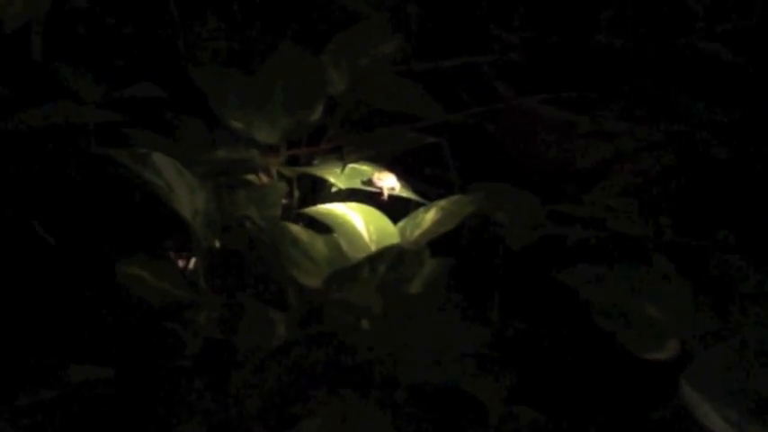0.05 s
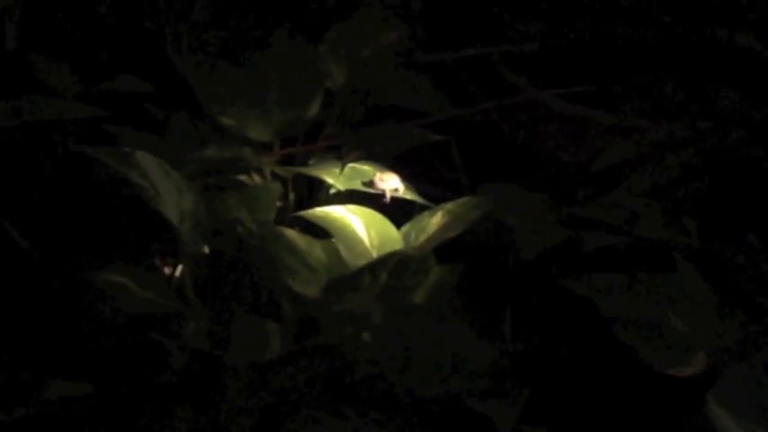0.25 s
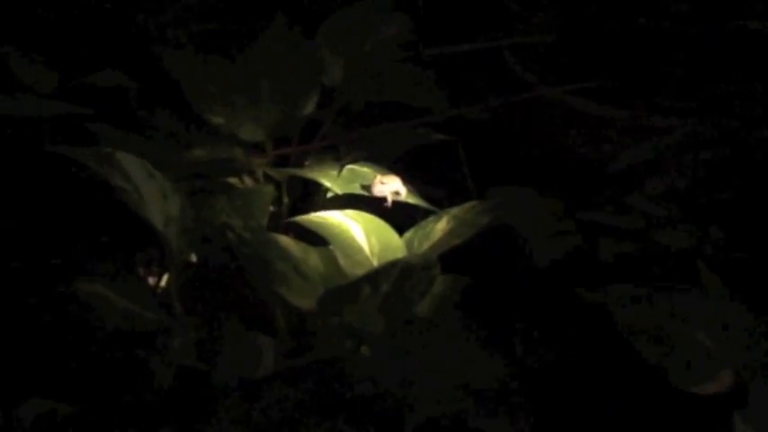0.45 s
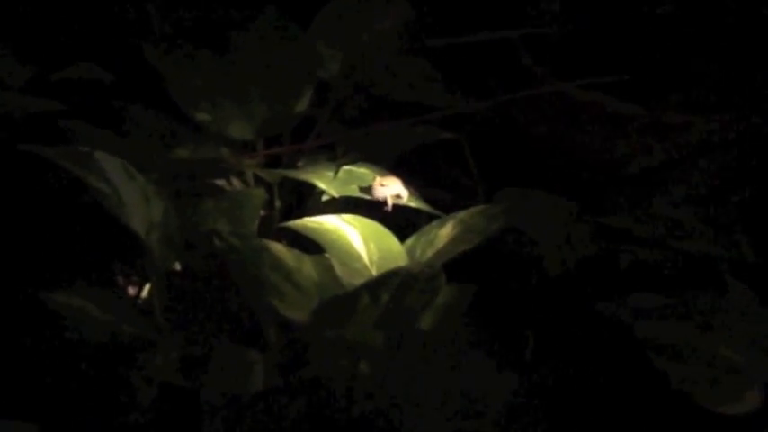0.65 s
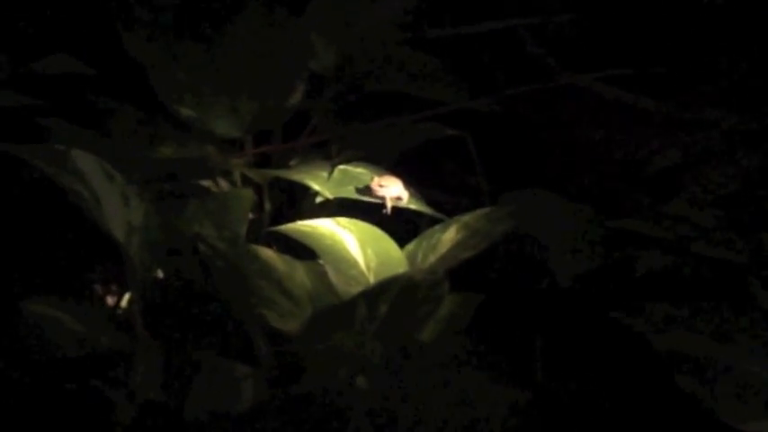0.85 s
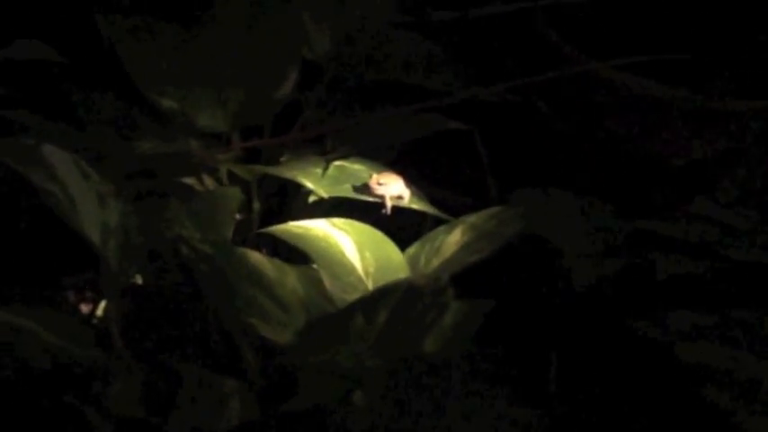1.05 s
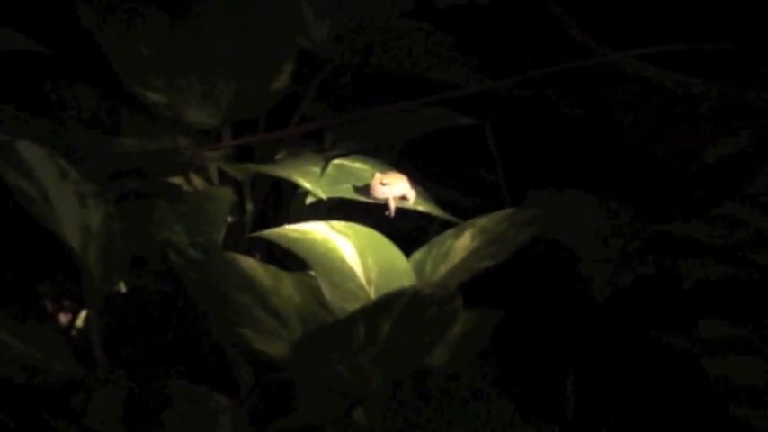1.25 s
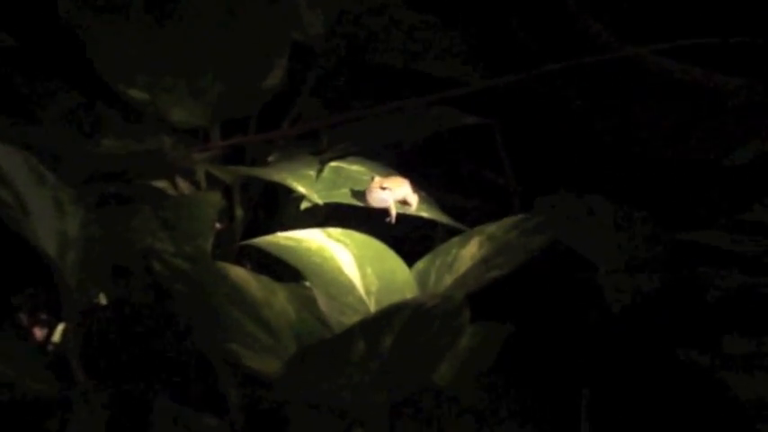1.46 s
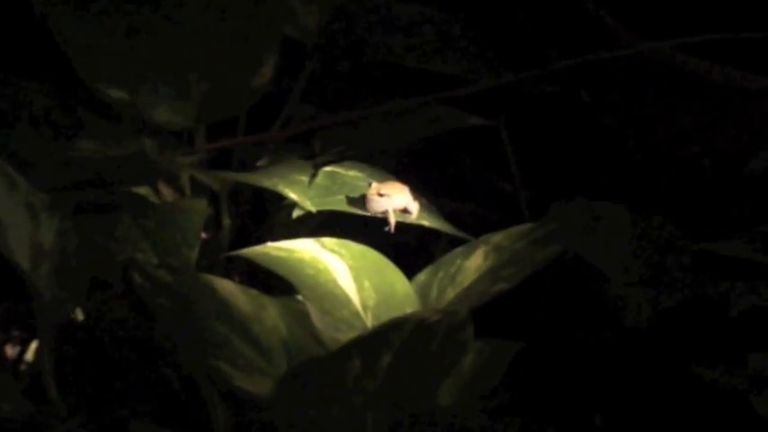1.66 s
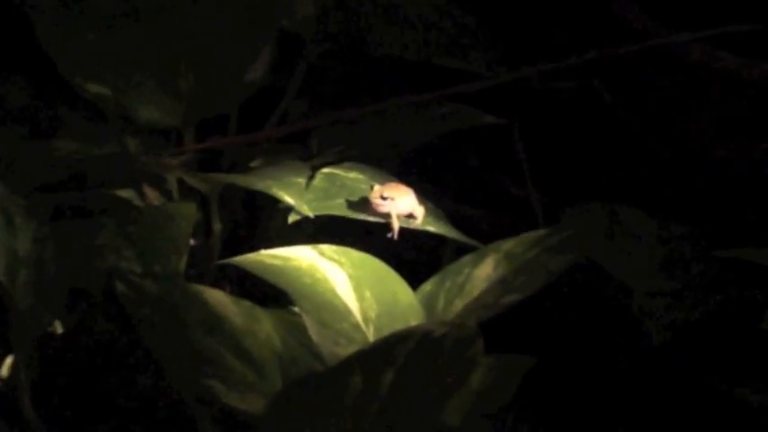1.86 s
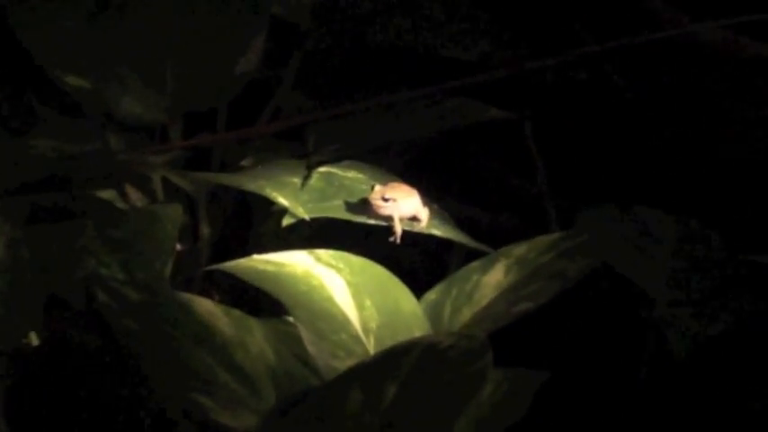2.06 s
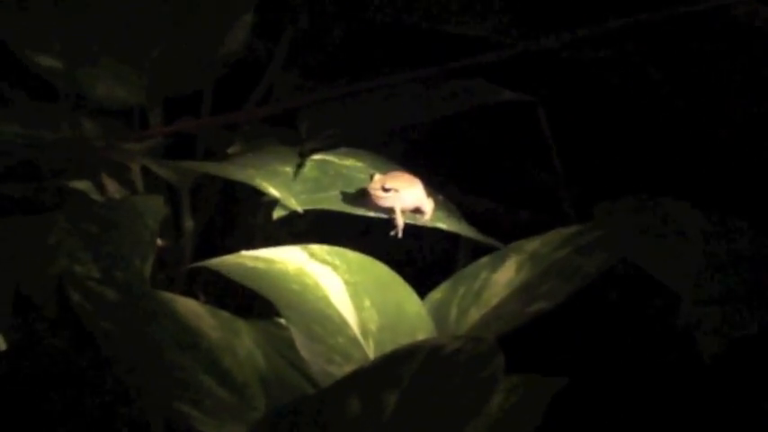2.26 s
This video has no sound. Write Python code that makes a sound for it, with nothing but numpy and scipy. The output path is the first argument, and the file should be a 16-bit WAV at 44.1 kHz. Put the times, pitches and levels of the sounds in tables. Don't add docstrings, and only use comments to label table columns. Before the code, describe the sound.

A small tree frog whistles two loud low-to-high calls close by in a night garden

```python
import sys
import numpy as np
from scipy import signal
from scipy.fft import rfft, irfft
from scipy.io import wavfile
from scipy.ndimage import uniform_filter1d

SR = 44100
rng = np.random.default_rng(int(sys.argv[2]) if len(sys.argv) > 2 else 0)


def digitize_waveform(pressure):
    field = np.atleast_2d(pressure).T
    bounded = np.clip(field, -1, 1)
    quanta = np.round(bounded * 32767).astype(np.int16)
    wavfile.write(sys.argv[1], SR, quanta)


def magnitude_from_level(level_db):
    exponent = np.asarray(level_db, float) / 20
    return 10 ** exponent


N = 101429
T = np.arange(N + SR // 2) / SR - .5


def drift(rate):
    r = np.exp(-2 * np.pi * rate / SR)
    slow = signal.lfilter([1], [1, -2 * r, r * r], rng.standard_normal(len(T) + SR))[SR:]
    return slow / slow.std()


def rms_one(x):
    return x / np.sqrt(np.mean(x ** 2))


def unit_energy(x):
    return x / np.sqrt(np.sum(x ** 2))


def resonate(x, hz, width_hz):
    r = np.exp(-np.pi * width_hz / SR)
    return signal.lfilter([1, 0, -1], [1, -2 * r * np.cos(2 * np.pi * hz / SR), r * r], x)


def gate(t, length, attack, release):
    rise = 1 - np.exp(-np.maximum(t, 0) / attack)
    return rise * np.exp(-np.maximum(t - length, 0) / release)


def tone_at(hz):
    return np.sin(2 * np.pi * np.cumsum(hz) / SR)


def night_air():
    # f/Hz, level/dB per Hz
    air = [(15, -50), (25, -22.5), (381, -6), (1710, -13), (2040, -9), (3960, -9), (5650, -19.5),
           (7290, -17.5), (11000, -28), (14200, -78.5), (22000, -120)]
    hz, db = np.transpose(air)
    f = np.maximum(np.fft.rfftfreq(len(T), 1 / SR), 1)
    tilt = magnitude_from_level(np.interp(np.log(f), np.log(hz), db))
    hush = irfft(rfft(rng.standard_normal(len(T))) * tilt, len(T))
    return magnitude_from_level(-49.5) * rms_one(hush)


def distant_chorus():
    # f/Hz, width/Hz, level/dB
    chorus = [
        (2039, 78, -55.5),
        (3610, 360, -52.5),
        (3870, 180, -54),
        (266, 59, -67.5),
    ]
    out = 0
    for centre_hz, width_hz, level_db in chorus:
        band = resonate(rng.standard_normal(len(T)), centre_hz, width_hz)
        band = resonate(band, centre_hz, width_hz)
        out = out + magnitude_from_level(level_db + 1.8 * drift(12)) * rms_one(band)
    return out


def motor():
    # t/s, f/Hz, level/dB
    hum = [(0.0, 395.2, -47.5), (0.154, 399.3, -58.5), (0.178, 396.7, -73), (0.218, 417, -54.5),
           (0.614, 419, -67.5), (0.628, 406.5, -57), (0.846, 396.4, -48), (0.94, 398.4, -59),
           (1.002, 396, -46), (1.144, 393.6, -63), (1.172, 394, -50.5), (1.332, 387.3, -68.5),
           (1.546, 415.2, -71), (1.6, 397, -62.5)]
    fade_s = 0.033
    s, hz, db = np.transpose(hum)
    fade = np.exp(-np.maximum(T - s[-1], 0) / fade_s)
    return np.sqrt(2) * magnitude_from_level(np.interp(T, s, db)) * fade * tone_at(np.interp(T, s, hz))


def insects():
    # strokes/per s, sweep from f/Hz, sweep to f/Hz, level/dB
    buzzers = [
        (134.4, 7550, 6670, -55.5),
        (128.7, 6900, 7510, -61),
        (134.6, 7350, 6320, -60.5),
    ]
    stroke_s, echo_s, echo_db = 0.005, .006, 1.5
    jitter, throb_db = .0007, 1.8
    t = np.arange(SR // 10) / SR
    share = np.minimum(t / stroke_s, 1)
    out = 0
    for rate, from_hz, to_hz, db in buzzers:
        wingbeat = np.cumsum(rate * (1 + jitter * drift(1.5))) / SR
        strokes = np.diff(np.floor(wingbeat), prepend=0)
        sweep = np.sin(np.pi * share) * tone_at(from_hz + (to_hz - from_hz) * share)
        leaves = np.exp(-t / echo_s) * rng.standard_normal(len(t))
        leaves = (t == 0) + magnitude_from_level(echo_db) * unit_energy(leaves)
        buzz = signal.fftconvolve(strokes, signal.fftconvolve(sweep, leaves))[:len(T)]
        out = out + magnitude_from_level(db + throb_db * drift(3)) * rms_one(buzz)
    return out


def cricket():
    # t/s, peak level/dB
    chirps = [(0.0623, -64), (0.196, -56), (0.9817, -59), (1.0161, -54), (1.0969, -60.5), (1.7634, -72)]
    chirp_hz, chirp_s = 5290, .018
    envelope = sum(magnitude_from_level(db) * gate(T - s, chirp_s, .002, 0.004) for s, db in chirps)
    return envelope * np.sin(2 * np.pi * chirp_hz * T)


def whistle(row, low_s, high_db, rise_hz, break_db, octave_db, half_db, slow, sag):
    # multiple, level/dB
    overtones = [(2, -18.5), (3, -34.5), (4, -48.5), (5, -52)]
    start, low_hz, high_hz, high_s, db = row
    t = T - start
    u = np.maximum(t - low_s, 0)
    phase = 2 * np.pi * np.cumsum(low_hz + rise_hz * (1 - np.exp(-u / 0.0059))) / SR

    ending = np.exp(np.minimum(t - low_s + 0.0045, 0) / .007)
    tone = np.sin(phase)
    tone = tone + magnitude_from_level(-10.5 * ending) * sum(magnitude_from_level(d) * np.sin(k * phase) for k, d in overtones)
    half_line = gate(t, low_s - .004, .001, 0.00067) * np.sin(phase * 3 / 2)
    tone = tone + magnitude_from_level(half_db) * ending * half_line
    swell_db, swell_s = -4, 0.019
    swell = magnitude_from_level(swell_db * np.exp(-np.maximum(t, 0) / swell_s))
    low = swell * gate(t, low_s, .0018, 0.0027) * tone

    crack = magnitude_from_level(break_db) * np.sin(phase) + magnitude_from_level(octave_db) * np.sin(2 * phase)
    crack = crack * gate(t - low_s + 0.0062, 0.012, 0.0057, 0.0019)

    v = np.maximum(u - .00004 * max(rise_hz - 100, 0), 0)
    droop = np.clip((v - high_s) / .04 + 1, 0, 1)
    shortfall = .12 * np.exp(-v / .0055) + slow * np.exp(-v / .03) + sag * droop
    high = magnitude_from_level(high_db - 6 * droop) * gate(v, high_s, 0.0089, .008) * tone_at(high_hz * (1 - shortfall))
    return magnitude_from_level(db) * (low + crack + high)


def garden(x, wet_db, t60, wall_s, wall_db):
    early_db, early_s, wall_spread_s, wall_cut_hz = -5.5, .03, 0.023, 1160
    t = np.arange(SR) / SR
    early = 1 + magnitude_from_level(early_db) * np.exp(-t / early_s)
    shape = magnitude_from_level(-60 * t / t60) * early * np.minimum(t / 0.0015, 1)
    wall = np.exp(-((t - wall_s) / wall_spread_s) ** 2) * rng.standard_normal(SR)
    wall = signal.sosfilt(signal.butter(2, wall_cut_hz, fs=SR, output="sos"), wall)
    echo = unit_energy(shape) * rng.standard_normal(SR) + magnitude_from_level(wall_db) * unit_energy(wall)
    return magnitude_from_level(wet_db) * signal.fftconvolve(x, echo)[:len(x)]


def far_frogs():
    # t/s, low f/Hz, high f/Hz, high note length/s, level/dB; the row at -0.08 s, at the neighbour's
    far_calls = [(-.03, 1985, 3585, 0.23, -47), (.37, 1958, 3550, 0.16, -51), (.85, 1992, 3643, 0.17, -58),
                 (1.048, 1975, 3580, 0.18, -47), (1.37, 2110, 4130, .14, -55),
                 (-.08, 2035, 4138, 0.16, -53.5), (1.51, 1958, 3456, 0.41, -53),
                 (2.07, 1987, 3562, 0.36, -47.5)]
    far = sum(whistle(call, low_s=.078, high_db=1.9, rise_hz=66, break_db=-13, octave_db=-22.5,
                      half_db=-26.5, slow=.035, sag=.01) for call in far_calls)
    return far + garden(far, wet_db=5, t60=0.6, wall_s=.2, wall_db=-15)


def neighbour_frog():
    # t/s, low f/Hz, high f/Hz, high note length/s, level/dB
    answers = [
        (-.4, 2070, 4123, 0.24, -35.5),
        (0.615, 2096, 4075, 0.18, -29),
        (1.822, 2086, 4106, .185, -29),
    ]
    # t/s, level/dB
    direct_curve = [(0, 11), (.66, 0.5), (.78, -2.8), (.9, -9), (1.86, 5), (1.948, -8), (1.956, 8), (2.03, 8),
                    (2.05, -2)]
    voice = sum(whistle(call, low_s=.043, high_db=3.8, rise_hz=260, break_db=3.0, octave_db=-2.5,
                        half_db=-27.5, slow=.068, sag=.05) for call in answers)
    direct = voice * magnitude_from_level(np.interp(T, *np.transpose(direct_curve)))
    return direct + garden(voice, wet_db=2.4, t60=0.63, wall_s=.10, wall_db=-20)


def near_frog():
    # t/s, low f/Hz, high f/Hz, high note length/s, level/dB
    near_calls = [
        (0.233, 2086, 3777, 0.19, -10),
        (1.1938, 2089, 3768, 0.21, -10),
    ]
    near = sum(whistle(call, low_s=.069, high_db=2.5, rise_hz=100, break_db=-15, octave_db=-9,
                       half_db=-11.5, slow=.04, sag=.027) for call in near_calls)
    return near + garden(near, wet_db=-11, t60=0.51, wall_s=.255, wall_db=-20)


def scene():
    background = night_air() + distant_chorus() + motor() + insects() + cricket()
    frogs = far_frogs() + neighbour_frog() + near_frog()
    return (background + frogs)[None, -N:]


def band_limit(x):
    return signal.sosfilt(signal.butter(12, 11110, fs=SR, output="sos"), x)


def record(dry):
    from_db, share, attack_s, release_db_per_s = -20, 0.66, 0.16, 152.5
    t = np.arange(N) / SR
    level = 10 * np.log10(uniform_filter1d(dry[0] ** 2, size=256) + 1e-12)
    over = share * np.maximum(level - from_db, 0)
    recovery = release_db_per_s * t
    held = np.maximum.accumulate(over + recovery) - recovery
    r = np.exp(-1 / (attack_s * SR))
    eased = signal.lfilter([1 - r], [1, -r], held)
    mix = dry * magnitude_from_level(-np.minimum(held, eased))
    return band_limit(mix)


dry = scene()
out = record(dry)
digitize_waveform(out)
```